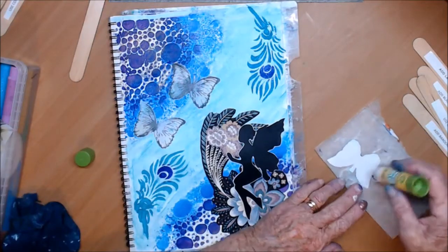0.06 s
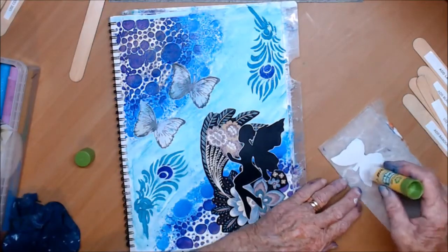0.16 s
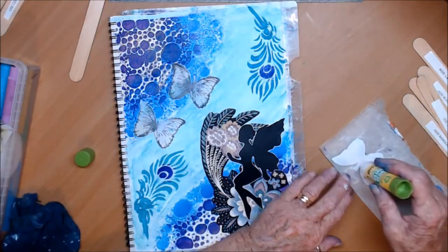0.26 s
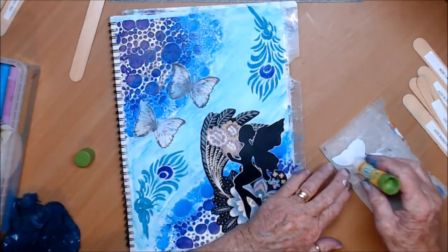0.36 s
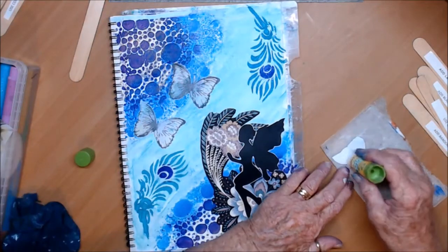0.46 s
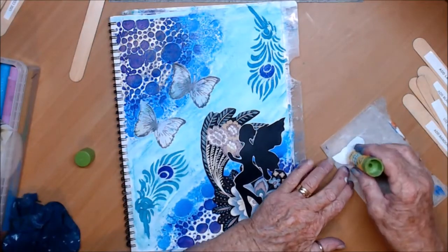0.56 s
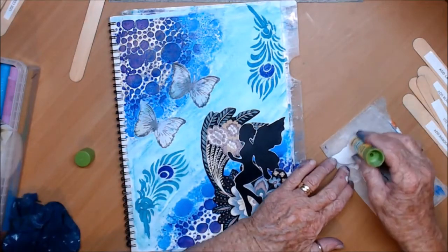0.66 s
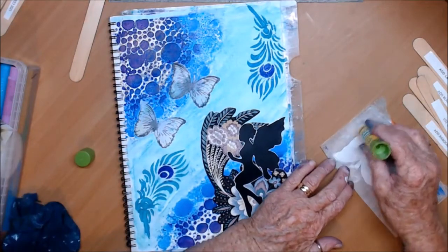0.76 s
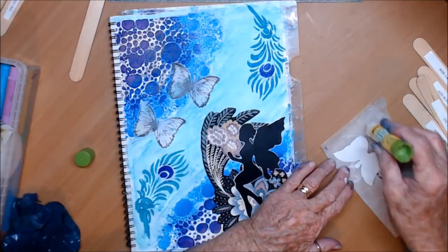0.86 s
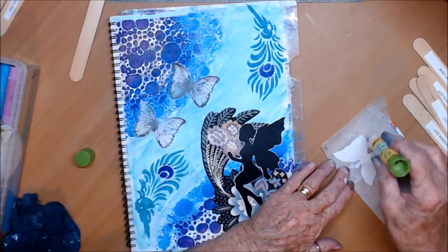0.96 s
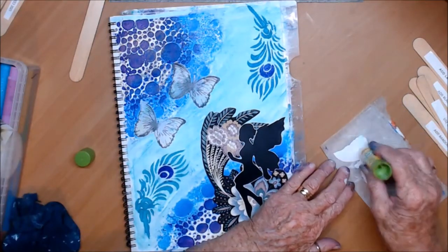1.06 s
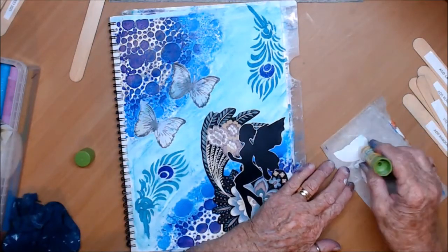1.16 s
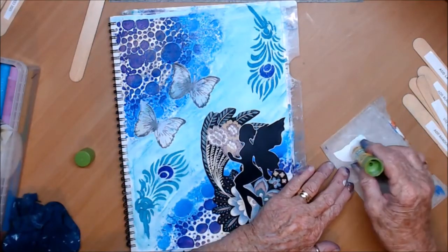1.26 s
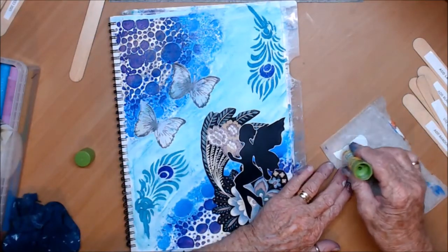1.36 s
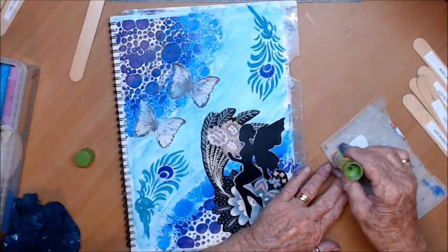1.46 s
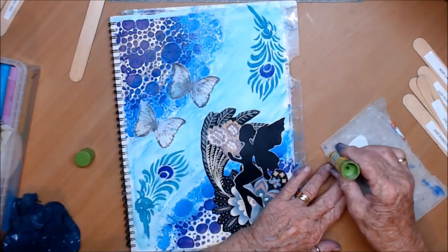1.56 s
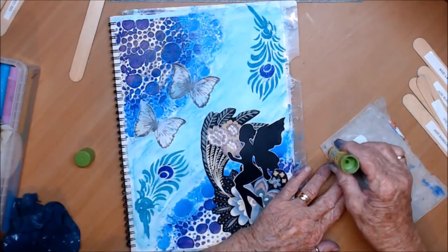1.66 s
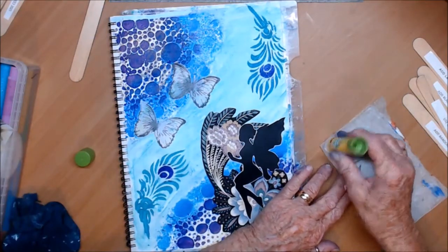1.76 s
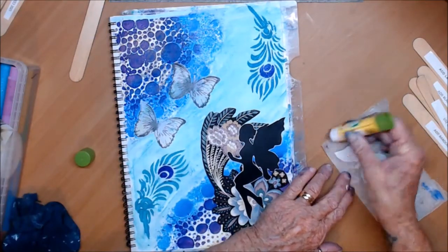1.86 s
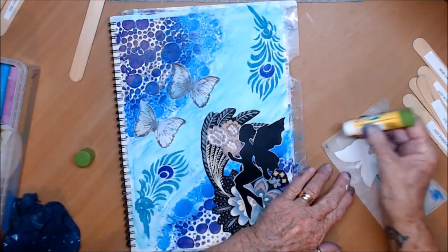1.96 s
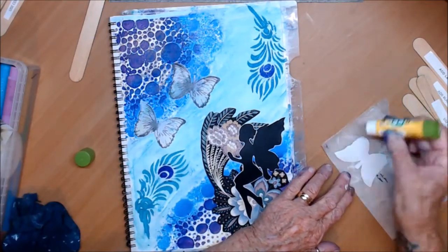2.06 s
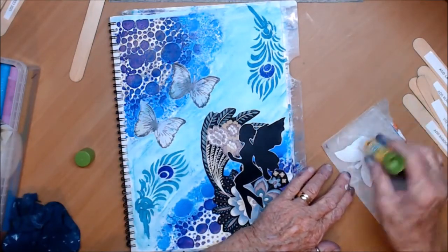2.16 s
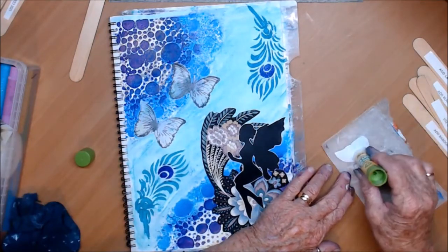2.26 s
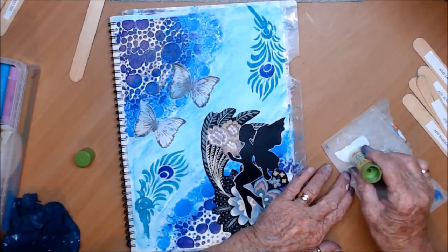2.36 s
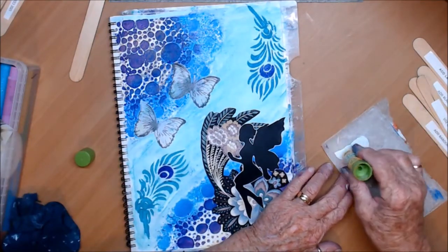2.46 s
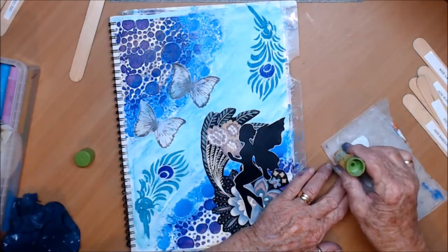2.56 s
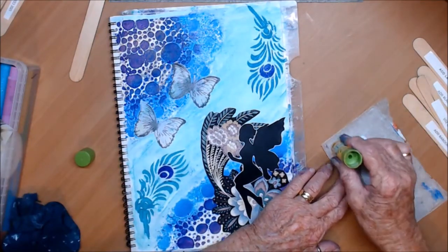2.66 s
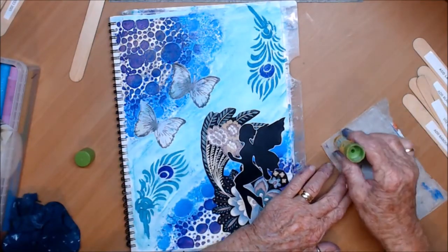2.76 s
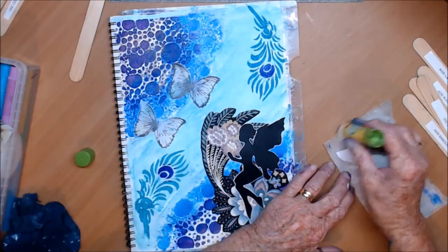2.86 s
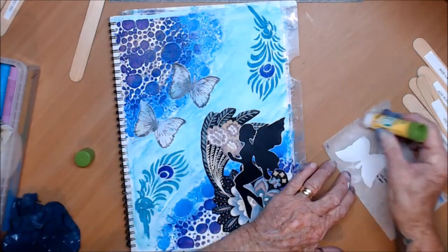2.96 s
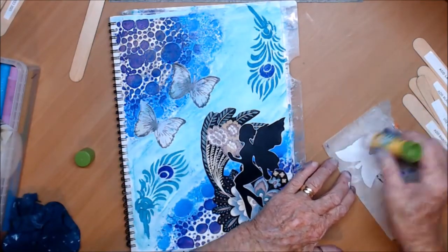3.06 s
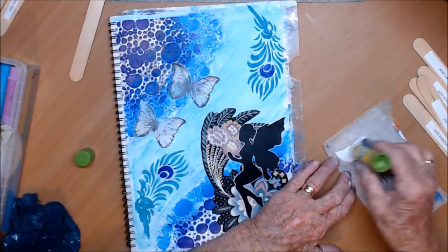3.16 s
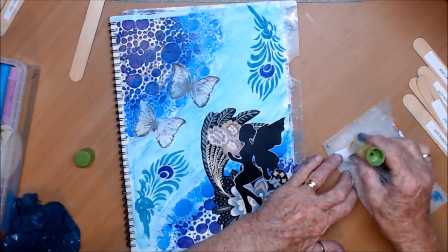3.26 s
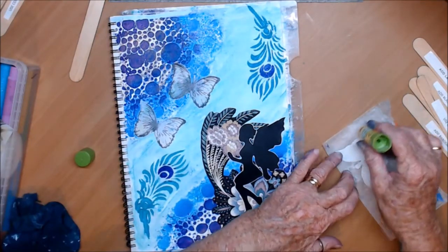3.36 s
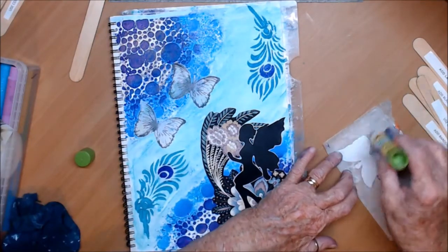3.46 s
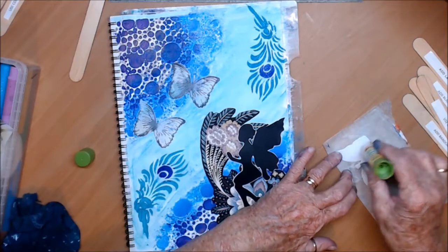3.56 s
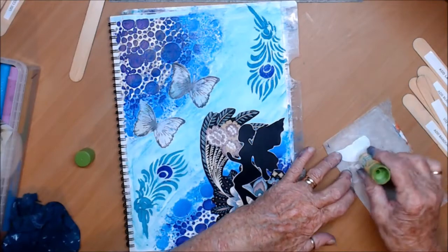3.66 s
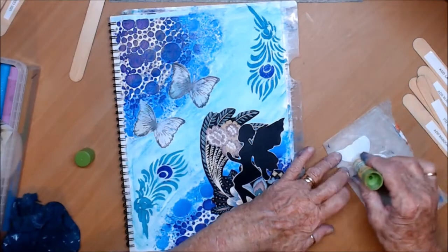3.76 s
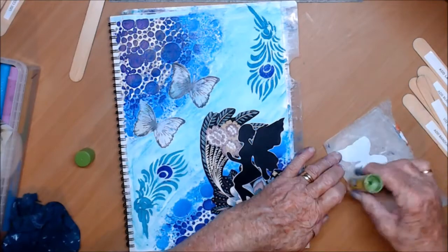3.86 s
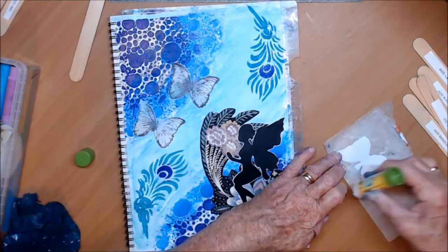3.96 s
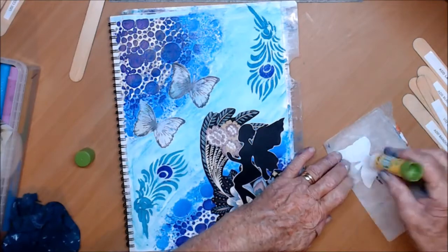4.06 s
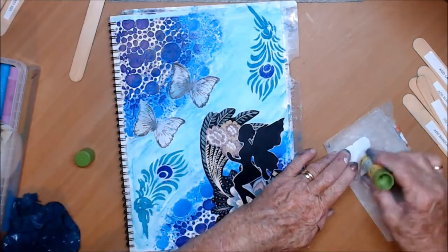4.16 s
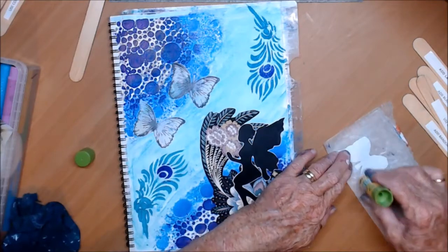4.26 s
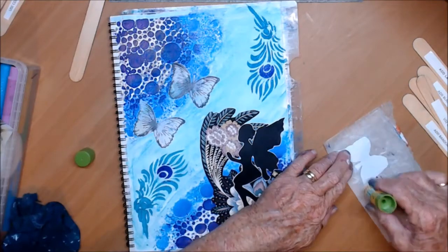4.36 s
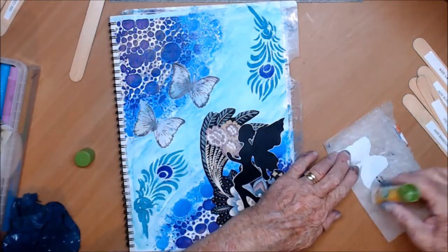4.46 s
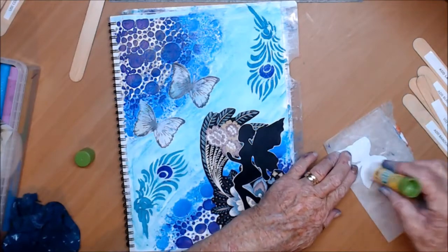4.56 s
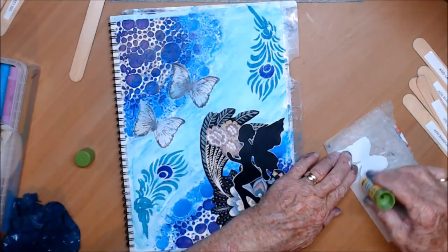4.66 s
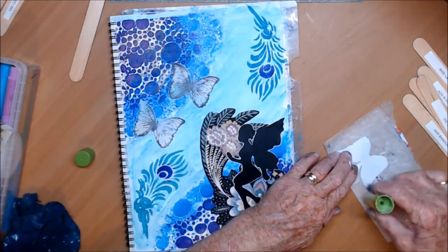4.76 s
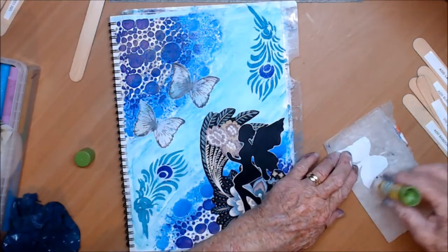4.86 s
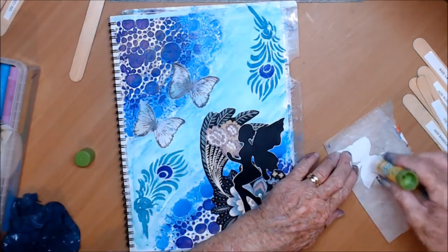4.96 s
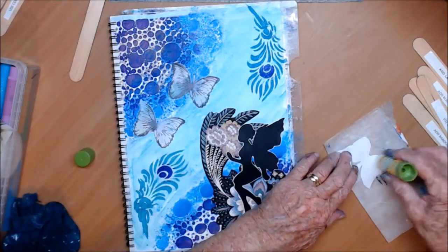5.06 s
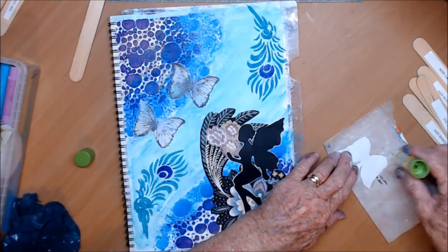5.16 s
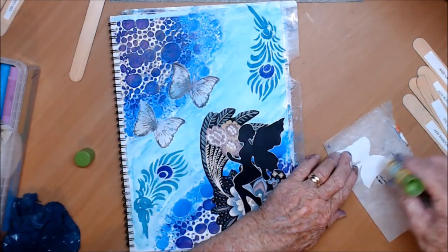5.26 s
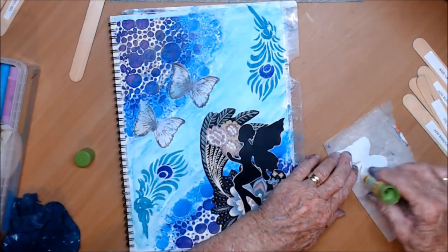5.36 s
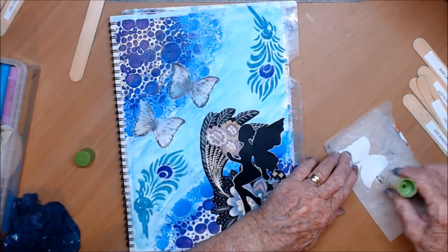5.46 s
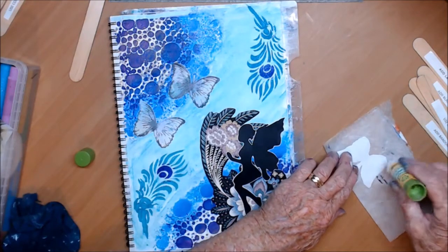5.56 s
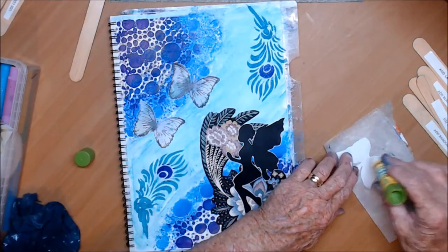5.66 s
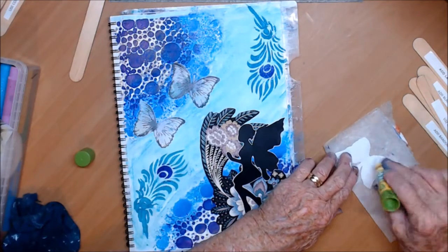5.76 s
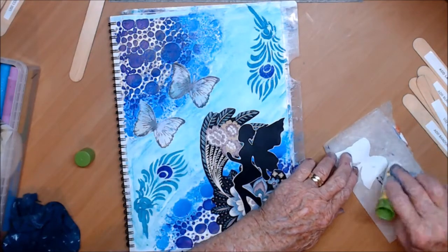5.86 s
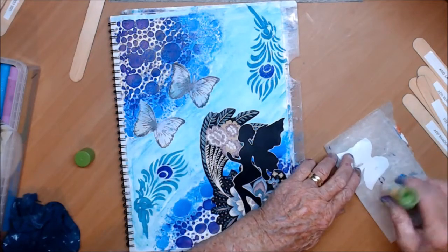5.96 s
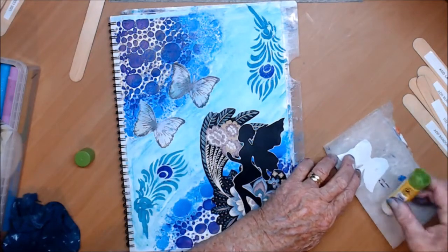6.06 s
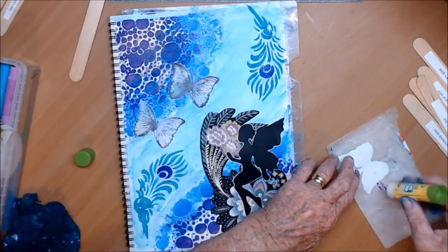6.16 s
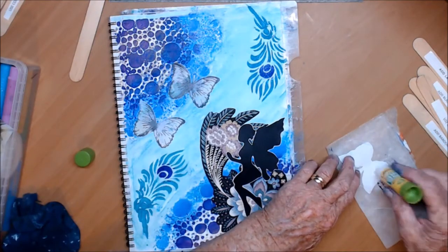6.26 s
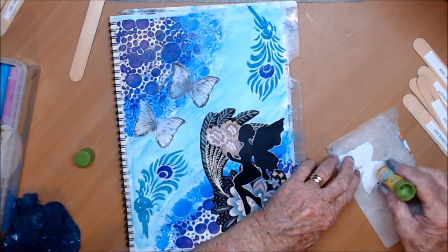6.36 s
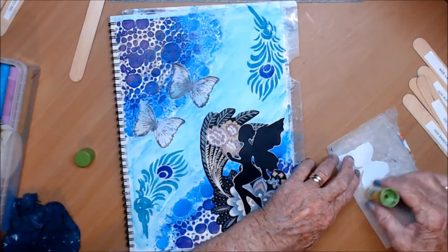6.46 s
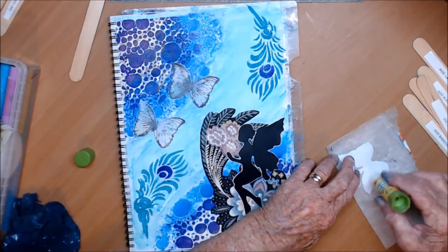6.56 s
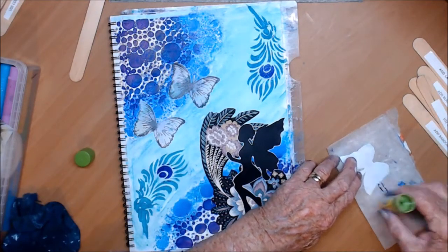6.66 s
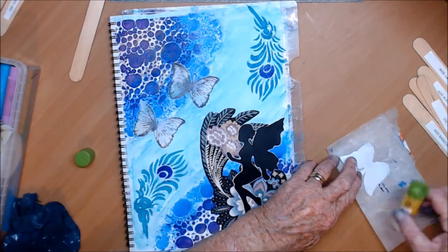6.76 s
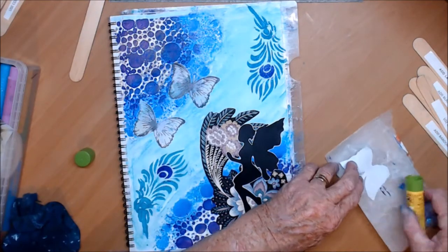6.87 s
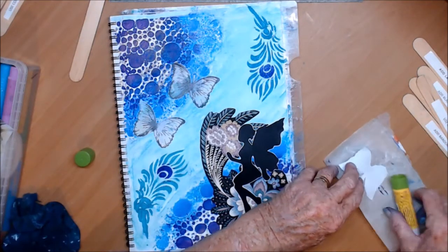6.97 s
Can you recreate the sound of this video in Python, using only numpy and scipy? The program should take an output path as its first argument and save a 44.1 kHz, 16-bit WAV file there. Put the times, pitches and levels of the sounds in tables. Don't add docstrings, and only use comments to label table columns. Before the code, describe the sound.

In a small quiet room with a low fan hum, a hand drags a glue stick over paper on a plastic sheet. Rustles and sticky crackles come first, then about a dozen separate dabs thump the wooden desk with a short hollow rattle. Soft humming rubs and faint squeaks fill the gaps. At the end the sheet rustles and the stick falls with a hard clack. Stereo microphone close above the desk.

```python
import sys
import numpy as np
from scipy import signal
from scipy.fft import rfft, irfft, next_fast_len
from scipy.io import wavfile
from scipy.ndimage import uniform_filter1d

SR = 44100
rng = np.random.default_rng(int(sys.argv[2]) if len(sys.argv) > 2 else 0)


def gain_from_decibels(decibels):
    exponent = np.asarray(decibels, float) / 20
    return 10 ** exponent


def dump(signal):
    limited = np.clip(np.atleast_2d(signal).T, -1, 1)
    pcm = np.round(limited * 32767).astype(np.int16)
    wavfile.write(sys.argv[1], SR, pcm)


N = 309141
DESK_LAG, SHEET_LAG = 1, 2


def noise(*shape):
    return rng.standard_normal(shape)


def unit(x):
    return x / np.sqrt(np.mean(x ** 2))


def colour(x, points):
    hz, db = np.transpose(points)
    size = next_fast_len(N, real=True)
    grid = np.arange(size // 2 + 1) * SR / size + 1
    gain = gain_from_decibels(np.interp(np.log(grid), np.log(hz), db))
    return irfft(rfft(x, size) * gain, size)[..., :N]


def band(x, hz, width_hz):
    return signal.lfilter(*signal.iirpeak(hz, hz / width_hz, fs=SR), x)


def ring(modes, size, delay_ms=0.):
    t = np.maximum(np.arange(size) / SR - delay_ms / 1000, 0)
    out = np.zeros(size)
    for k, (hz, db, t60) in enumerate(modes):
        out += (-1) ** k * gain_from_decibels(db) * np.sin(2 * np.pi * hz * t) * 1000 ** (-t / t60)
    return out


def push(x, ms):
    u = np.arange(int(1.5 * ms * SR / 1000) + 3) / (ms * SR / 8000)
    return signal.fftconvolve(x, u ** 2 * np.exp(-u))[:len(x)]


def add(track, s, sound, peak_db):
    i = int(s * SR)
    part = sound[..., :N - i]
    track[..., i:i + part.shape[-1]] += part * gain_from_decibels(peak_db) / np.abs(sound).max()


def walk(rate):
    k = int(SR / rate)
    steps = np.repeat(noise(N // k + 1), k)
    return unit(uniform_filter1d(steps, k)[:N])


def pair(x, pan_db, lag):
    return np.array([np.roll(x, lag) * gain_from_decibels(pan_db / 2), x * gain_from_decibels(-pan_db / 2)])


def spikes(t, rise_s):
    return gain_from_decibels(2.5 * rng.exponential(size=len(t))) * (1 - np.exp(-t / rise_s))


def strokes(peak_s, peak_db, swell_s, fade_s):
    t, gain = np.arange(N) / SR, np.zeros(N)
    for s, db, swell, fade in zip(peak_s, peak_db, swell_s, fade_s):
        near = slice(max(int((s - 2 * swell) * SR), 0), int((s + 2 * fade) * SR))
        distance = np.maximum((s - t[near]) / swell, (t[near] - s) / fade)
        gain[near] += gain_from_decibels(db - 30 * distance)
    return gain


# f/Hz, level/dB per Hz
AIR_COLOUR = [(25, -17.5), (50, -13.5), (72, -28), (100, -22.5), (135, -19.5), (200, -19.5), (300, -21.5),
              (620, -28), (800, -23), (1250, -28.5), (2700, -29), (3500, -35.5), (8000, -43),
              (15700, -51.5)]
# f/Hz, width/Hz, level/dB
FAN_LINES = [
    (47, 12, -72),
    (101.6, 8, -79.5),
    (196.6, 10, -87.5),
    (806, 6.1, -90.5),
    (1233, 230, -87.5),
    (5300, 3, -108),
]


def air():
    mid, side = colour(noise(2, N), AIR_COLOUR)
    side = colour(side, [(60, -1.5), (250, -2), (800, -5.0), (4500, 0.5)])
    tone = unit(mid + side * np.array([[1], [-1]])) * gain_from_decibels(-77.5 + 1.7 * walk(5.5))
    fan = np.zeros(N)
    for hz, width, db in FAN_LINES:
        fan += unit(band(band(noise(N), hz, width), hz, 2 * width)) * gain_from_decibels(db)
    whine_hz, pulses_hz = 8080, 29.8
    gate = np.sin(2 * np.pi * pulses_hz * np.arange(N) / SR) > 0
    whine = unit(band(band(noise(N) * gate, whine_hz, 300), whine_hz, 423)) * gain_from_decibels(-100)
    return tone + pair(fan, 1.5, DESK_LAG) + whine


def room(x):
    t, t60_s = np.arange(SR // 2) / SR, 0.17
    tail = noise(2, len(t)) * 1000 ** (-t / t60_s) * (t > .004)
    tail /= np.sqrt(np.sum(tail ** 2, axis=1, keepdims=True))
    return signal.fftconvolve(x[None], tail, axes=1)[:, :N] * gain_from_decibels(-7.5)


# peak t/s, level/dB, swell t/s, fade t/s, f/Hz
SQUEAKS = [
    (2.619, -81, .2, 0.13, 2600),
    (4.36, -81, .4, .3, 2400),
    (6.1, -78, 0.13, .08, 3300),
    (7.07, -55, .01, .08, 2520),
    (6.69, -67.5, 0.057, 0.064, 3200),
]


def squeak():
    film, out, width_hz = noise(2, N), np.zeros((2, N)), 90
    for s, db, swell, fade, hz in SQUEAKS:
        out += unit(band(band(film, hz, width_hz), hz, width_hz)) * strokes([s], [db], [swell], [fade])
    return out


# f/Hz, width/Hz, level/dB
DRAG_TONES = [
    (366.1, 23, 0),
    (458, 28, -15.5),
    (578, 40, -16.5),
    (1143, 150, -23),
]
# peak t/s, level/dB, swell t/s, fade t/s
DRAG_SURGES = [(.38, -69.5, 0.17, 0.22), (1.366, -72.5, 0.084, 0.033), (1.552, -67.5, 0.13, 0.21),
               (1.73, -64.5, 0.12, 0.093), (1.876, -73.5, 0.24, .06), (2.508, -66, 0.056, 0.084),
               (2.622, -72.5, 0.11, 0.32), (2.724, -66.5, 0.38, 0.049), (3.44, -68, 0.1, 0.048),
               (3.56, -74, 0.31, .03), (3.768, -66.5, 0.024, 0.32), (3.804, -75, 0.18, 0.078),
               (3.88, -63.5, 0.031, .06)]


def drag():
    slip, hum = noise(N), np.zeros(N)
    for hz, width, db in DRAG_TONES:
        hum += gain_from_decibels(db) * unit(band(band(slip, hz, width), hz, width))
    hum /= 0.34 + np.sqrt(uniform_filter1d(hum ** 2, 1500))
    return unit(hum) * strokes(*np.transpose(DRAG_SURGES))


# f/Hz, level/dB per Hz
SHEET_COLOUR = [(1500, -33.5), (2800, -11), (3900, 0.5), (5900, 6), (7700, 2), (10000, 0), (15700, -16)]
# peak t/s, level/dB, level of the low part/dB, swell t/s, fade t/s
RUSTLES = [(0.044, -47.5, -49.5, .065, 0.037), (0.15, -58.5, -66.5, 0.051, 0.1),
           (0.461, -58, -59, .07, 0.16), (0.53, -67, -73, .1, .09), (0.664, -77.5, -95, 0.026, 0.18),
           (0.763, -62.5, -70.5, .012, 0.12), (1.53, -74, -82, .25, 0.028),
           (1.55, -57.5, -62.5, 0.034, .035), (1.652, -63.5, -78, 0.041, 0.23),
           (1.914, -62, -61.5, 0.087, 0.049), (2.494, -78, -81, .07, 0.51), (2.906, -60, -70, 0.12, 0.03),
           (3.469, -60.5, -76, 0.014, .055), (3.669, -49, -42.5, 0.011, 0.042),
           (3.746, -72, -80, 0.11, 0.22), (4.3, -74.5, -81.5, 0.083, 0.077), (4.756, -72, -73, .017, 0.22),
           (5.19, -74.5, -78.5, 0.046, .07), (5.835, -67.5, -77, 0.48, 0.069),
           (6.075, -61, -67.5, 0.014, 0.21), (6.69, -66, -74, 0.036, 0.057), (6.858, -55, -59.5, .08, 0.04),
           (6.986, -60.5, -59, 0.46, 0.12), (7.01, -35, -36, 0.027, .1)]


def rustle():
    grains = noise(2, N) * gain_from_decibels(2.8 * np.minimum(rng.exponential(size=N), 7) + 3.0 * walk(120))
    grains[0] = .7 * np.roll(grains[1], SHEET_LAG) + .7 * grains[0]
    settles = [(s + 0.032, db - 53, db - 50, .01, 0.035) for s, db, *_ in DABS]
    touches = [(s, db - 46, db - 49, 0.022, .01) for s, db, *_ in DABS]
    s, high_db, low_db, swell, fade = np.transpose(RUSTLES + settles + touches)
    high = unit(colour(grains, SHEET_COLOUR)) * strokes(s, high_db, swell, fade)
    low = unit(band(band(grains, 2600, 2200), 2600, 3000)) * strokes(s, low_db, swell, fade)
    return (high + low) * gain_from_decibels(-3)


# t/s, peak level/dB, patch f/Hz, left minus right level/dB
CRACKLES = [(0.0157, -47, 3300, 5), (0.0488, -37, 3660, 5), (0.1438, -54.5, 5000, 5),
            (0.4293, -50.5, 5000, 5), (0.4503, -42, 4780, 5), (0.4614, -36, 5730, -1),
            (0.5285, -51, 4640, 8), (0.6895, -49, 6350, -12), (0.7029, -45.5, 6280, -1),
            (0.764, -40, 6230, -7), (0.774, -54, 6460, 5), (0.8085, -48, 6430, -3), (0.84, -48, 5700, -1),
            (1.5341, -53, 4600, 8), (1.5507, -44, 5520, -3), (1.6393, -48.5, 7250, 2),
            (1.9038, -44.5, 7050, 5), (2.8918, -46.5, 5260, 6.5), (3.471, -47.5, 5900, -7),
            (3.6695, -35, 6300, 5), (4.7564, -53.5, 6840, -5), (6.0737, -54, 5700, 4.5),
            (6.155, -53, 5400, 5), (6.8237, -58, 4020, -4), (6.8398, -42.5, 4770, 5),
            (6.8533, -44, 6200, -5), (6.9192, -49.5, 2840, 5), (6.9279, -49, 2550, 7),
            (6.9455, -53, 2720, -7), (6.9753, -48.5, 3520, 0.5)]
# t/s, peak level/dB, patch f/Hz
FAINT_CRACKLES = [(0.0325, -70, 2760), (0.5058, -53, 4430), (0.552, -56.5, 4370), (0.6636, -54.5, 6600),
                  (0.7529, -57.5, 6200), (0.8638, -64.5, 5330), (1.447, -61, 4620), (1.4833, -56.5, 6900),
                  (1.7322, -61.5, 4970), (1.8345, -56.5, 5940), (1.8546, -58.5, 5670), (1.8815, -61.5, 5320),
                  (2.3695, -54.5, 7700), (2.488, -65, 4200), (2.825, -64.5, 3550), (2.8608, -59, 5740),
                  (2.88, -53, 5250), (3.303, -57.5, 7100), (3.4, -62, 6220), (3.427, -59, 7000), (3.4889, -60, 3170),
                  (3.7472, -61, 3600), (4.2927, -53.5, 7300), (4.498, -70.5, 4850), (5.1887, -69, 5440),
                  (5.5286, -68.5, 6850), (5.8011, -62, 2530), (6.4166, -68, 9380), (6.6837, -54.5, 4010),
                  (6.8046, -71.5, 2740)]


def crackle():
    out, t = np.zeros((2, N)), np.arange(4000) / SR
    rise_s, t60_s, faint_pan_db = .002, 0.048, 3
    for s, db, hz, pan_db in CRACKLES + [(*row, faint_pan_db) for row in FAINT_CRACKLES]:
        ticks = noise(2, 4000) * spikes(t, rise_s) * 1000 ** (-t / t60_s)
        ticks = pair(ticks[0], np.clip(pan_db, -5, 5), SHEET_LAG) + 0.98 * ticks[::-1]
        patch = band(band(ticks, hz, 0.39 * hz), hz, .5 * hz)
        fizz = band(band(ticks, 8600, 6400), 5200, 8500)
        add(out, s - rise_s, patch + 0.51 * fizz + 0.16 * ticks, db + 2.5)
    return out


# f/Hz, level/dB, time to fade 60 dB t/s
BARREL = [(688, -1.5, 0.031), (1129, 3.5, 0.024), (1730, -5.5, 0.035), (2550, -10, 0.013),
          (3060, -38, 0.009), (4730, -21, .02), (7000, -29, .015), (11500, -30, .012)]


def barrel_blow():
    return push(ring(BARREL, size=4000), 0.52)


# t/s, peak level/dB
DROP = [
    (6.986, -45.5),
    (6.993, -44),
    (6.999, -39),
    (7.002, -32),
    (7.0052, -15),
]


def drop():
    out = np.zeros(N)
    for s, db in DROP:
        add(out, s, -barrel_blow(), db)
    return out


def tip_over():
    out = np.zeros(N)
    add(out, 3.668, barrel_blow(), -38)
    return out


# f/Hz, level/dB, time to fade 60 dB t/s
DESK = [(46, -10.5, 0.097), (79.7, -2.5, 0.15), (109, -18, 0.247), (146.1, -18, 0.24), (193.6, -15, 0.16),
        (219.4, -10.5, 0.19), (246.4, -17, 0.21), (332.7, -19.5, 0.22), (361.2, -8, 0.14),
        (433.9, -6.5, 0.14), (483, -11, 0.21), (486, -25, 0.21), (563, -6.5, 0.15), (576.4, -28, 0.18),
        (662.4, -16, 0.11), (711, -9, 0.13), (784, -25.5, 0.17), (790, -17.5, 0.077), (888, -18.5, 0.15),
        (1003, -34.5, 0.33), (1127, -28.5, 0.32), (1113, -22, 0.16), (1276, -28, 0.25), (1494, -20.5, 0.15),
        (1663, -24, 0.0973), (1669, -34, 0.17), (1720, -39.5, 0.099)]
# delay/ms, f/Hz, level/dB, time to fade 60 dB t/s
WAVES = [
    (3.59, 602.3, 11.5, 0.018),
    (5.577, 523, 5.5, 0.0075),
    (6.673, 1250, -7.5, 0.04),
    (20.394, 460, 2, 0.016),
]
DESK_SIZE = SR // 3


def bending_waves():
    out = -ring([(300, 1, 0.011)], size=DESK_SIZE)
    for delay_ms, *mode in WAVES:
        out += ring([mode], size=DESK_SIZE, delay_ms=delay_ms)
    return out


def desk_ring(modes):
    return ring(modes, size=DESK_SIZE, delay_ms=2.394)


# t/s, peak level/dB, contact/ms
BUMPS = [
    (.53, -50, 13),
    (3.681, -44.5, 3.9),
    (3.919, -58, 13.4),
    (6.169, -45, 12.7),
    (7.004, -27, 3.4),
]


def bumps():
    out, body = np.zeros(N), bending_waves() + desk_ring(DESK)
    for s, db, ms in BUMPS:
        add(out, s, push(body, ms), db)
    return out


# t/s, length t/s, peak level/dB
SCUFFS = [
    (0.469, 0.037, -49.5),
    (0.755, 0.036, -71),
    (4.498, 0.069, -58.5),
    (4.741, 0.033, -56.5),
    (5.775, 0.081, -44.5),
    (6.154, 0.023, -60),
    (6.912, 0.035, -59),
]


def scuffs():
    out, body = np.zeros(N), bending_waves() + desk_ring(DESK)
    for s, length, db in SCUFFS:
        size = int(length * SR)
        grind = push(noise(size) * np.hanning(size), 0.1)
        add(out, s, signal.fftconvolve(grind, body), db)
    return out


# f/Hz, width/Hz, level/dB
TUBE = [(2250, 300, -4), (3400, 260, 0), (4500, 300, 0), (5900, 350, -5), (7250, 300, -1), (8400, 260, 0),
        (9500, 350, -6), (11250, 260, -1), (12300, 350, -5), (15000, 400, -9)]


def tube_rattle():
    out, t = np.zeros((2, N)), np.arange(5000) / SR
    tube_db, rattle_t60_s, slap_t60_s = -31, .11, .05
    for s, db, _, _, slap_db in DABS:
        rattle = (noise(5000) + noise(2, 5000)) * spikes(t, .003)
        fading = rattle * 1000 ** (-t / rattle_t60_s)
        rung = np.zeros((2, 5000))
        for (hz, width, level_db), grip_db in zip(TUBE, 3.5 * noise(len(TUBE))):
            tone = band(fading, hz * (1 + grip_db / 150), 1.4 * width)
            rung += gain_from_decibels(level_db + grip_db) * band(tone, hz, 2 * width)
        add(out, s, rung, db + tube_db)
        slap = band(band(rattle * 1000 ** (-t / slap_t60_s), 4000, 7600), 4500, 13000)
        add(out, s, slap, slap_db)
    return out


def wash():
    out, t = np.zeros((2, N)), np.arange(8000) / SR
    hz, width_hz, wash_db, t60_s, rise_s = 1290, 880, -26, .1, .004
    for s, db, contact_ms, *_ in DABS:
        burst = noise(2, 8000) * (1 - np.exp(-t / rise_s)) * 1000 ** (-t / t60_s)
        add(out, s, band(band(burst, hz, width_hz), hz, width_hz), db + wash_db - 3. * contact_ms)
    return out


# t/s, peak level/dB, contact/ms, level of bending waves over the desk's ring/dB, slap level/dB
DABS = [(0.467, -28.5, 3.54, 3, -56), (1.116, -16.5, 1.2, 4.1, -38.5), (2.242, -19.5, 1.4, 4, -45),
        (3.1955, -18, 0.72, 2.5, -43.5), (3.6045, -22, 1.14, -0.5, -51.5), (4.1466, -17.5, 1.04, 2, -39),
        (4.6252, -20, 1.17, 1, -46), (5.0262, -24, 1.46, 2, -49), (5.3511, -17.5, 1.47, 3.5, -49),
        (5.71, -21, 2.12, 2, -46), (6.36, -36.5, 3.4, -2.5, -85), (6.615, -20, 1.57, 3, -46.5)]


def dabs():
    out, waves = np.zeros(N), bending_waves()
    for s, db, contact_ms, waves_db, _ in DABS:
        tip = noise(400) * np.hanning(400)
        add(out, s - 0.0098, push(tip, 1.6), db - 30)
        spot = DESK + noise(len(DESK), 3) * [0, 2.5, 0]
        blow = gain_from_decibels(waves_db) * waves + desk_ring(spot)
        add(out, s - .0007, push(blow, contact_ms), db)
    return out


def scene():
    wood = dabs() + bumps() + scuffs() + tip_over()
    bright = crackle() + rustle() + tube_rattle() + pair(drop(), 2.7, SHEET_LAG)
    thump = pair(wood + drag(), 2.7, DESK_LAG) + room(band(wood, 1100, 1900)) * gain_from_decibels(0.5)
    return thump + bright + room(bright.mean(axis=0)) + air() + wash() + squeak()


def low_pass(x):
    return signal.sosfilt(signal.butter(12, 15820, fs=SR, output="sos"), x)


def record(dry):
    heard = colour(dry, [(7600, 2.5), (8800, -4.5), (16000, 3)])
    return low_pass(heard)


dry = scene()
out = record(dry)
dump(out)
```